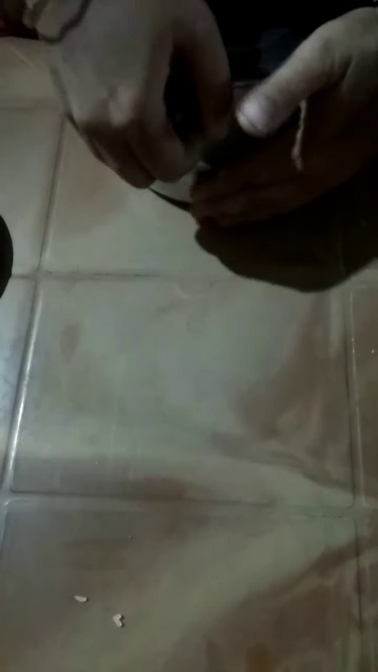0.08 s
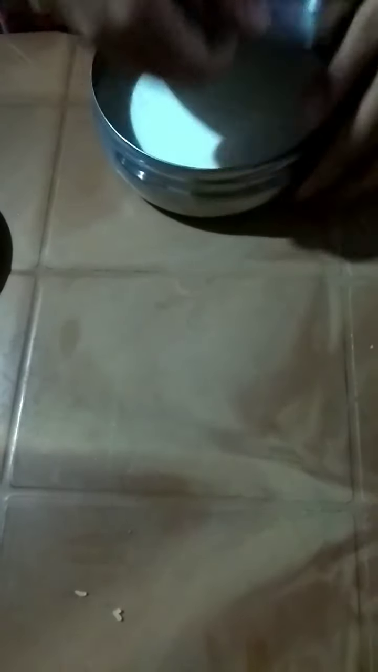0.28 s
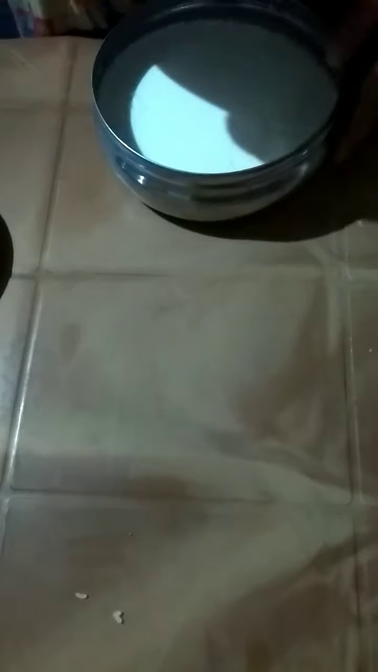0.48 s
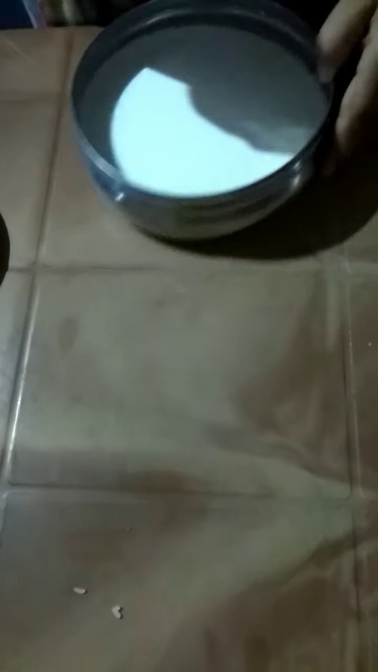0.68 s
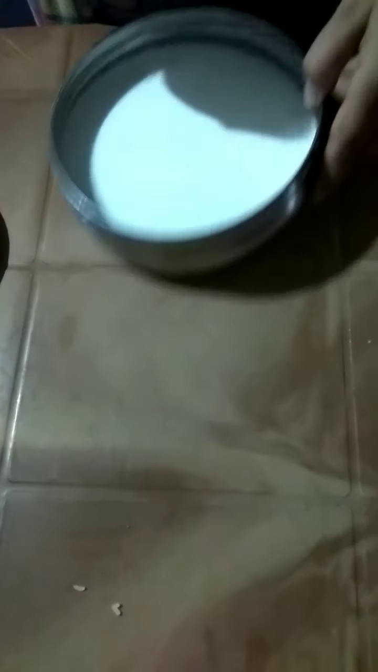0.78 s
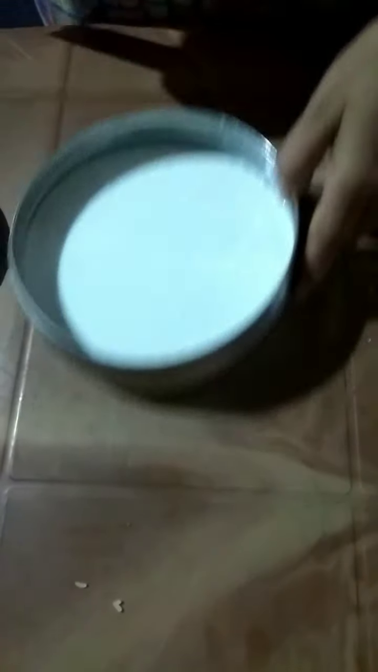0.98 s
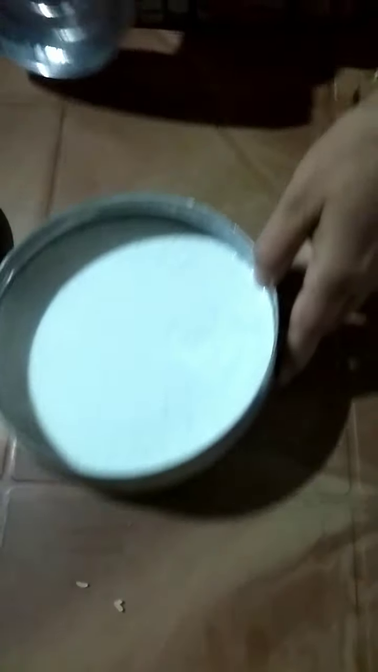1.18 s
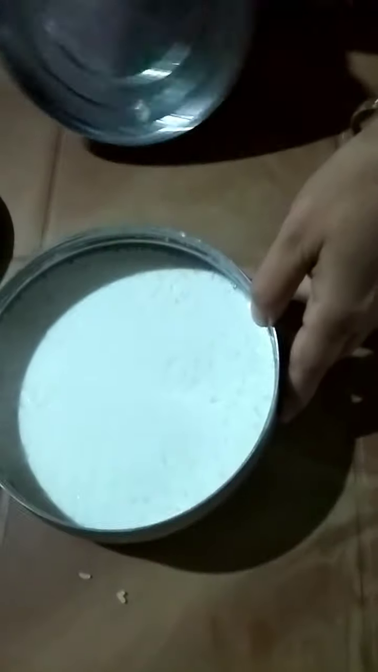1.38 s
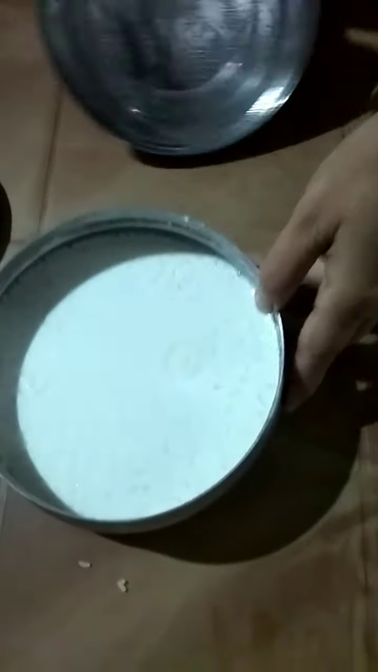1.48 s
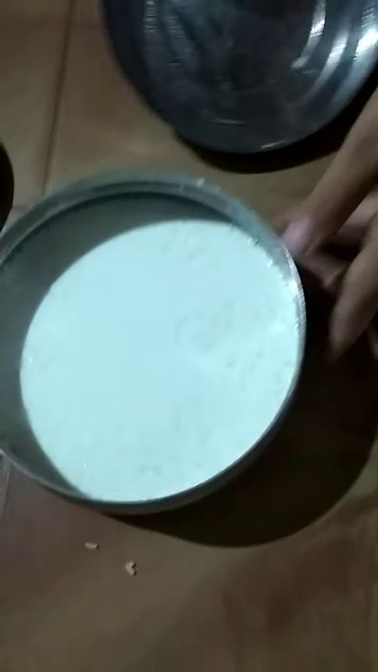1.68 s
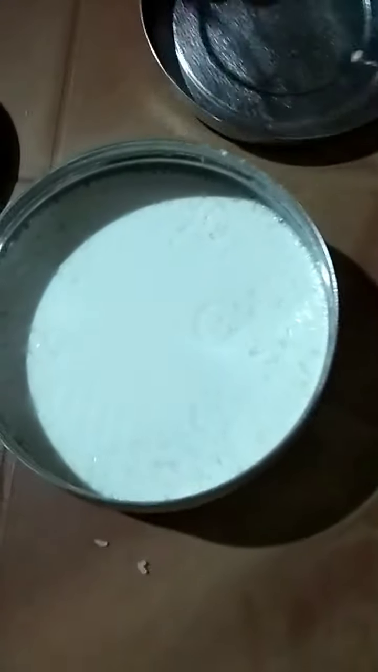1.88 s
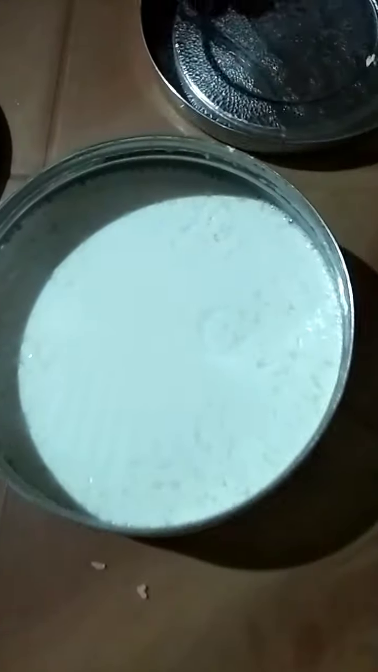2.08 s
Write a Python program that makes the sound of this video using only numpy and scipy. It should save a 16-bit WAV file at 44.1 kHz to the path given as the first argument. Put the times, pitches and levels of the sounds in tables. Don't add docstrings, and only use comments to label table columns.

```python
import sys
import numpy as np
from scipy import signal
from scipy.fft import rfft, irfft, next_fast_len
from scipy.io import wavfile
from scipy.ndimage import uniform_filter1d, map_coordinates

SR = 44100
rng = np.random.default_rng(int(sys.argv[2]) if len(sys.argv) > 2 else 0)


def output_pcm(signal):
    pcm = np.clip(np.atleast_2d(signal).T, -1, 1) * 32767
    wavfile.write(sys.argv[1], SR, np.round(pcm).astype(np.int16))


def magnitude_from_level(level_db):
    exponent = np.asarray(level_db, float) / 20
    return 10 ** exponent


N = 92610

# freq_hz, level_db_per_hz
HISS = [(240, -43), (400, -10), (2050, -13), (2210, -9.5), (3320, -14), (6180, 5), (10300, 2.5),
        (14500, -1.5), (16500, -28)]
AIR = [(12, -31), (22, 10), (70, -5.5), (208, -5), (248, -8), (289, -1.5), (420, -33.5), (880, -120)]
HISS_DB, HISS_SWAY_DB = -50, .4
AIR_DB, AIR_SWAY_DB = -56, 2
# freq_hz, likeness_0_to_1
ALIKE = [(60, 0.98), (250, 1), (600, 0.45), (2000, 0.088), (10000, 0.063)]
# freq_hz, gain_db
MIC = [(4500, 1), (6500, 0), (7500, 3), (8300, -2.5), (10200, 5), (11200, 2), (12700, 0.5), (14200, 4)]
EDGE_HZ = 16500
LAG_S, FRONT_LAG_S = 15 / SR, 3 / SR
HOLE_SHARE, WEAK_SHARE, TOP_HZ = .27, .95, 15600

# freq_hz, t60_s
KITCHEN = [(100, 0.4), (500, 0.54), (2000, 0.58), (6000, 0.33), (14000, 0.38)]
# freq_hz, gain_db
WET = [(100, -12), (500, -1.5), (760, 3), (1050, -3), (1900, -1.5), (3000, 5.5), (4500, 2.5), (10000, 4)]
BOWL_WET_DB, SMALL_WET_DB, RING_WET_DB = -3, -6, -22

# time_s, pressure_db
DRAG = [(0, -46.5), (.15, -66.5), (0.223, -44.5), (0.502, -88), (0.601, -56.5), (.7, -47), (.84, -46),
        (.95, -48.5), (1.1, -45), (1.281, -49), (1.4, -54), (1.5, -59.5), (2.1, -93)]
# time_s, level_db
WEIGHT = [
    (0, 0),
    (.64, 0),
    (.72, -9),
    (.85, -10),
    (.89, 0),
    (1.02, -1),
    (1.065, -7),
    (1.09, 0),
    (1.4, 0),
]
# freq_hz, level_db_per_hz
GRIT = [(410, -15.5), (700, -11), (1520, -15), (2530, -15.5), (3370, -17.5), (5060, -12), (12200, -10),
        (16000, -24.5)]
RUMBLE = [(15, -27.5), (25, -2), (170, -8), (210, -34), (301, -25), (591, -43.5), (900, -49), (1170, -46),
          (1980, -120)]
RUMBLE_DB, RUMBLE_GROWS, LUMPY_DB = -45.5, 3.6, 3

# start_s, peak_db, pitch_hz, way (1 catches, -1 lets go)
SLIPS = [(0.596, -44, 260, 1), (0.612, -47, 229, 1), (.627, -43, 280, 1), (0.6612, -35.5, 480, 1),
         (0.6639, -32, 516, 0.95), (.667, -37, 330, 0.94), (0.6706, -33.5, 240, -1.1),
         (0.8676, -39.5, 300, -1.1), (.875, -38.5, 220, -0.81), (0.894, -42, 300, 1), (.911, -39, 400, -1),
         (.925, -31.5, 333, 0.85), (0.9372, -37, 420, -1.1), (.947, -35.5, 520, -0.96),
         (0.9621, -36, 265, 1), (.987, -39.5, 300, -1), (.9995, -41, 260, -1), (1.022, -40.5, 220, -0.92),
         (1.0858, -31.5, 260, -0.61), (1.115, -39, 218, -0.88), (1.133, -33, 150, -1),
         (1.138, -39, 200, -1), (1.202, -42, 220, -1), (1.209, -45, 420, 1), (1.229, -43, 278, -1),
         (1.305, -41, 300, -1), (1.312, -45, 500, 0.93), (1.345, -45, 260, 1)]
SLIP_CYCLES = 1.14
# start_s, length_s, level_db, middle_hz
RUBS = [
    (0, 0.026, -43.5, 610),
    (.595, 0.043, -47.5, 600),
    (.652, .03, -41, 620),
    (0.863, .13, -44.5, 473),
    (1.182, 0.042, -62, 590),
    (1.296, .03, -56, 700),
]
RUB_PER_S, RUB_SPREAD = 500, .5
# freq_hz, level_db, t60_s
TAP = [(1270, -36, .035), (800, -41, .04), (2450, -43, .03)]
TAP_S = 1.0805

BUMP_S = (0, .008, .05, .189, .2, .236, .245, .6, .612, .657, .69, .868, .9, .925, .94, .946, .962, .998,
          1.02, 1.084, 1.0955, 1.131, 1.198, 1.238, 1.3, 1.343)
# peak_db, pitch_hz, t60_s
BUMPS = [(-14.5, 44, 0.024), (-34, 149, 0.11), (-45.5, 163, 0.29), (-40.5, 340, 0.016), (-34.5, 170, 0.039),
         (-19, 323, 0.031), (-25, 116, 0.12), (-40.5, 270, 0.064), (-40.5, 49.15, 0.35),
         (-36.5, 348, 0.069), (-43.5, 145, 0.32), (-38, 142, 0.18), (-45, 427, 0.081), (-43, 257, 0.044),
         (-29.5, 116, 0.1), (-50, 370, 0.014), (-39.5, 164, 0.13), (-29, 79, 0.032), (-51, 170, 0.025),
         (-39.5, 327, 0.035), (-21.5, 97, 0.042), (-41.5, 135, 0.15), (-36, 129, 0.083), (-31.5, 87, 0.075),
         (-55, 74, .1), (-32.5, 127, 0.12)]
# start_s, level_db, t60_s
LANDS = [
    (1.5654, -21, 0.026),
    (1.601, -58, .06),
    (1.637, -31, 0.026),
    (1.69, -33.5, 0.074),
    (1.741, -39.5, 0.092),
    (1.783, -46, 0.064),
    (1.84, -43, 0.06),
    (1.901, -56.5, 0.24),
]
# freq_hz, level_db, t60_s
BOWL = [(141, -25, 0.24), (288, -24.5, 0.13), (560, -55, 0.06), (838, -37, 0.067), (1110, -49, 0.023),
        (1430, -45.5, 0.38), (2345, -49.5, 0.33), (665, -48, 0.36), (2837, -54.5, 0.88), (3020, -56, 0.76)]
HOLLOW_HZ, PUSH_DB = 289.2, -19.5

LID_HZ = (754, 1019, 1250, 1548, 1780, 2093, 2180, 2573, 3060, 3433, 4802, 6160, 9505, 10400)
# level_db, t60_s
LID = [(4.5, 0.23), (4, .75), (-6, 0.62), (-0.5, 0.58), (-5.5, 0.3), (-12, 0.94), (-7, 0.59), (-7.5, 0.85),
       (-10, 1), (-4, 0.24), (-24, 0.58), (-12, 0.3), (-40, 0.74), (-23, .15)]
WAVER = .13
CAUGHT_S, CAUGHT_DB_PER_S = .33, 85
GRIP_S, GRIP_DB_PER_S = .47, 300
# start_s, level_db, low_hz, high_hz, t60_s
CROWDS = [
    (0.238, -27.5, 2304, 14680, 0.54),
    (1.565, -45, 699, 6430, 0.9),
]
# freq_hz, level_db, t60_s
RIM = [(1007, -42.5, 0.2), (1970, -47, 0.25), (4037, -54, 0.1)]
RIM_S = .68
# freq_hz, width_hz, level_db
SCRAPE = [(300, 360, -2.5), (1090, 890, 2), (2206, 480, -0.5), (3880, 1200, -4), (6170, 140, 4),
          (8130, 1330, -4), (9800, 2000, -2), (10300, 1450, 0), (12900, 1700, -11)]
# freq_hz, level_db, t60_s
SQUEAL = [(3500, 3, 0.087), (3880, -3, 0.035), (4740, -1, 0.032), (7150, -1, 0.033), (12600, -11, .05)]
POP_S, POP_LENGTH_S = .2355, 0.0075
POP_DB, SQUEAL_DB, RING_DB = -19.5, -10, -32
POP_PAN_DB, RING_PAN_DB = -6, -2
TICK_S = (-.01, .22, .2545, .4215, .6785, 1.081, 1.5645)
# level_db, length_s, body_hz, bright_db
TICKS = [
    (-51, 0.0067, 1430, -12),
    (-43.5, 0.022, 450, -5),
    (-35, 0.00064, 1300, -10),
    (-35.5, .008, 2500, 3),
    (-33, 0.0045, 3900, 4),
    (-41, 0.004, 1350, -6),
    (-27, 0.0039, 790, -17),
]
BRIGHT_HZ, BRIGHT_WIDTH_HZ, BODY_Q = 11260, 3100, 2.87


def unit(x):
    return x / np.sqrt(np.mean(x ** 2) + 1e-20)


def along(points, hz):
    f, v = np.transpose(points)
    return np.interp(np.log(hz + 1), np.log(f + 1), v)


def wobble(rate_hz):
    knots = rng.standard_normal(int(N * rate_hz / SR) + 4)
    return map_coordinates(knots, [np.arange(N) * rate_hz / SR])


def filtered(x, response):
    n = x.shape[-1]
    m = next_fast_len(n + SR // 2)
    return irfft(rfft(x, m) * response(np.fft.rfftfreq(m, 1 / SR)), m)[..., :n]


def add(track, start_s, sound):
    i = round((start_s + .5) * SR)
    track[..., i:i + sound.shape[-1]] += sound


def crop(track):
    return track[:, SR // 2:SR // 2 + N]


def balance(db):
    return magnitude_from_level(np.array([[db], [-db]]) / 2)


def lag(track, lag_s):
    delays_s = np.array([[lag_s], [0]])
    return crop(filtered(track, lambda f: np.exp(-2j * np.pi * f * delays_s)))


def rush(spectrum):
    def response(hz):
        turn = np.arccos(np.clip(along(ALIKE, hz), -1, 1)) / 2
        return magnitude_from_level(along(spectrum, hz)) * [np.cos(turn), np.sin(turn)]

    mid, side = filtered(rng.standard_normal((2, N)), response)
    return unit(np.array([mid + side, mid - side]))


def noise_floor():
    hiss = magnitude_from_level(HISS_DB + HISS_SWAY_DB * wobble(7.3)) * rush(HISS)
    air = magnitude_from_level(AIR_DB + AIR_SWAY_DB * wobble(6.78)) * rush(AIR)
    return hiss + air


def kitchen(x):
    hz, t, z = signal.stft(rng.standard_normal((2, SR)), SR, nperseg=256)
    decay = magnitude_from_level(-60 * t / along(KITCHEN, hz)[:, None])
    tail = signal.istft(z * decay, SR, nperseg=256)[1]
    low = filtered(tail, lambda f: 1 / (1 + (f / 350) ** 4))
    tail = tail - low + low.sum(0) / np.sqrt(2)
    tail = filtered(tail / np.linalg.norm(tail[0]), lambda f: magnitude_from_level(along(WET, f)))
    late = np.pad(x.mean(0), (150, 0))[None]
    return signal.fftconvolve(late, tail, axes=1)[:, :x.shape[1]]


def sparse(x):
    hz, _, z = signal.stft(x, SR, nperseg=1536)
    field = rng.standard_normal(z.shape[1:])
    field = uniform_filter1d(field, size=7, axis=0)
    field = uniform_filter1d(field, size=6, axis=1)
    field = unit(field) + along(MIC, hz)[:, None] / 10
    size = np.abs(z)
    outside_holes = field > np.quantile(field, HOLE_SHARE)
    strong = size > WEAK_SHARE * uniform_filter1d(size, size=24, axis=1)
    keep = (outside_holes & strong) | (hz[:, None] < 2800)
    return signal.istft(z * keep * (hz[:, None] < TOP_HZ), SR, nperseg=1536)[1][:, :N]


def drag():
    t = np.arange(N) / SR
    pressure_db = np.interp(t, *np.transpose(DRAG))
    weight_db = np.interp(t, *np.transpose(WEIGHT))
    hiss = magnitude_from_level(pressure_db + 0.56 * wobble(27.1) + 2.25 * wobble(90)) * rush(GRIT)
    lumps = unit(magnitude_from_level(LUMPY_DB * wobble(34.9)) * rush(RUMBLE))
    rumble_db = RUMBLE_DB + RUMBLE_GROWS * (pressure_db + 45.5) + weight_db
    return hiss + magnitude_from_level(rumble_db) * lumps


def jolt(hz, t):
    envelope = magnitude_from_level(-20 * hz * t / SLIP_CYCLES) * (1 - np.exp(-5 * hz * t))
    return -2 * np.sin(2 * np.pi * hz * t) * envelope


def ring(modes, t, waver, rise_s):
    total = 0
    for hz, db, t60_s in modes:
        slow = 1 + waver * map_coordinates(rng.standard_normal(30), [t * 40 + 2])
        total = total + magnitude_from_level(db - 60 * t / t60_s) * slow * np.sin(2 * np.pi * hz * t)
    return total * (1 - np.exp(-t / rise_s))


def rub():
    out, t = np.zeros(N + 2 * SR), np.arange(SR // 20) / SR
    for start_s, db, hz, way in SLIPS:
        add(out, start_s, way * magnitude_from_level(db) * jolt(hz, t))
    for start_s, length_s, db, hz in RUBS:
        for u, size, pitch in zip(rng.random(70), rng.standard_normal(70), rng.standard_normal(70)):
            at_s = u * 70 / RUB_PER_S
            if at_s < length_s:
                swell = np.sin(np.pi * at_s / length_s)
                slip = jolt(hz * np.exp(RUB_SPREAD * pitch), t)
                add(out, start_s + at_s, magnitude_from_level(db) * swell * size * slip)
    add(out, TAP_S, ring(TAP, t, 0, rise_s=.001))
    return out * balance(-.6)


def thud(db, hz, t60_s, t):
    puff = filtered(rng.standard_normal(len(t)), lambda f: f / hz / (1 + (f / (2.82 * hz)) ** 4))
    tone = np.sin(2 * np.pi * hz * t)
    return magnitude_from_level(db - 60 * t / t60_s) * (tone + 0.19 * unit(puff)) * (1 - np.exp(-t * hz * 3))


def bowl():
    out, t = np.zeros(N + 2 * SR), np.arange(SR // 2) / SR
    for start_s, (db, hz, t60_s) in zip(BUMP_S, BUMPS):
        add(out, start_s, thud(db, hz, t60_s, t))
    for start_s, db, t60_s in LANDS[1:]:
        add(out, start_s, thud(db, HOLLOW_HZ, t60_s, t))

    def half_sine(start_s, length_s):
        return np.sin(np.pi * np.clip((t - start_s) / length_s, 0, 1))

    push = -half_sine(0, 0.00098) + 0.7 * half_sine(0.0013, 0.0026) - .5 * half_sine(0.00293, 0.0014)
    add(out, LANDS[0][0], magnitude_from_level(PUSH_DB) * push + ring(BOWL, t, WAVER, rise_s=0.014))
    return out * balance(-1.2)


def peaks(rows):
    def response(f):
        total = 0
        for k, (hz, width_hz, db) in enumerate(rows):
            damping = 1j * f * width_hz
            total = total + (-1) ** k * magnitude_from_level(db) * damping / (hz * hz - f * f + damping)
        return total

    return response


def scrape(length_s, rows):
    t = np.arange(SR // 10) / SR
    grit = rng.standard_normal(len(t)) * magnitude_from_level(0.35 * rng.standard_normal(len(t)))
    envelope = (1 - np.exp(-t / 0.00012)) / (1 + (t / length_s) ** 4)
    x = filtered(grit * envelope, peaks(rows))
    return x / np.sqrt(np.sum(x ** 2) / (length_s * SR))


def crowd(t, low_hz, high_hz, t60_s, count):
    place, life, level, phase = rng.random((count, 4)).T[:, :, None]
    hz = low_hz * (high_hz / low_hz) ** np.sqrt(place)
    life_s = t60_s * (.5 + life) * (2000 / hz) ** 0.45
    modes = magnitude_from_level(11.4 * level - 2.5 - 60 * t / life_s) * np.sin(2 * np.pi * (hz * t + phase))
    return modes.sum(0) * (1 - np.exp(-t / 0.0018)) / np.sqrt(count)


def lid():
    pop, ticks, squeal, rings = np.zeros((4, 2, N + 2 * SR))
    t = np.arange(SR // 2) / SR
    pan, wide = balance(POP_PAN_DB), balance(RING_PAN_DB)
    add(pop, POP_S, magnitude_from_level(POP_DB) * pan * scrape(POP_LENGTH_S, SCRAPE))

    held = 1 / (1 + (t / POP_LENGTH_S) ** 6)
    add(squeal, POP_S, magnitude_from_level(SQUEAL_DB) * pan * held * ring(SQUEAL, t, 0, rise_s=0.0036))

    caught_s = np.clip(t + POP_S - CAUGHT_S, 0, 1)
    grip_s = np.clip(t + POP_S - GRIP_S, 0, 1)
    damped = magnitude_from_level(-CAUGHT_DB_PER_S * caught_s - GRIP_DB_PER_S * grip_s)
    modes = [(hz, db, t60_s) for hz, (db, t60_s) in zip(LID_HZ, LID)]
    add(rings, POP_S, magnitude_from_level(RING_DB) * wide * damped * ring(modes, t, WAVER, rise_s=0.0074))
    add(rings, RIM_S, ring(RIM, t, WAVER, rise_s=0.0013))
    for start_s, db, low_hz, high_hz, t60_s in CROWDS:
        pair = np.array([crowd(t[:SR * 2 // 5], low_hz, high_hz, t60_s, count=110) for _ in "LR"])
        add(rings, start_s, magnitude_from_level(db) * wide * pair)

    for start_s, (db, length_s, hz, bright_db) in zip(TICK_S, TICKS):
        body = [(hz, hz / BODY_Q, 0), (2.0 * hz, hz, -9)]
        bright = (BRIGHT_HZ, BRIGHT_WIDTH_HZ, bright_db - 7.0)
        add(ticks, start_s, magnitude_from_level(db) * balance(-2.4) * scrape(length_s, body + [bright]))
    return pop, ticks, squeal, rings


def scene():
    pop, ticks, squeal, rings = lid()
    base = bowl()
    to_walls = pop + magnitude_from_level(BOWL_WET_DB) * base + magnitude_from_level(SMALL_WET_DB) * ticks
    to_walls = to_walls + magnitude_from_level(RING_WET_DB) * (rings + squeal)
    walls = crop(kitchen(to_walls))
    floor = noise_floor()
    side = lag(pop + base + ticks + squeal, LAG_S)
    diffuse = sparse(walls + drag() + floor)
    front = lag(rings + rub(), FRONT_LAG_S)
    return side + diffuse + front


def roll_off(x):
    return signal.sosfilt(signal.butter(12, 16620, fs=SR, output="sos"), x)


def record(dry):
    mix = filtered(dry, lambda f: magnitude_from_level(along(MIC, f)) / (1 + (f / EDGE_HZ) ** 40))
    return roll_off(mix)


dry = scene()
out = record(dry)
output_pcm(out)
```